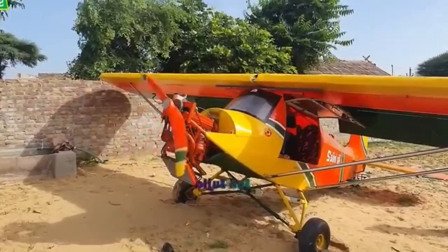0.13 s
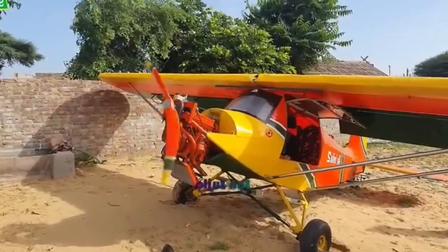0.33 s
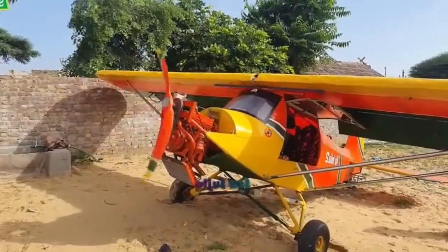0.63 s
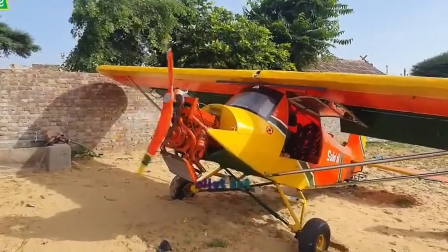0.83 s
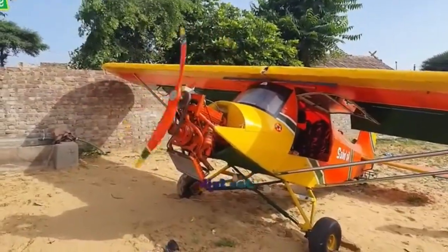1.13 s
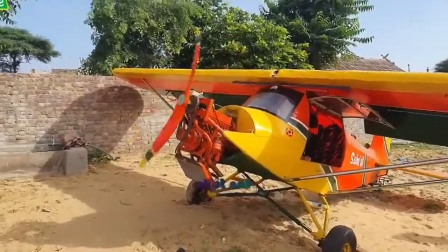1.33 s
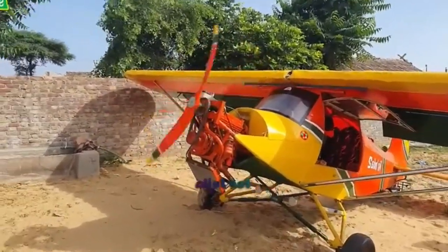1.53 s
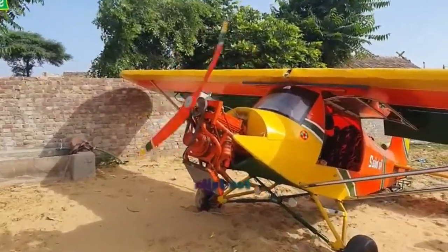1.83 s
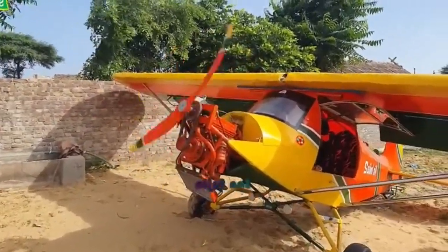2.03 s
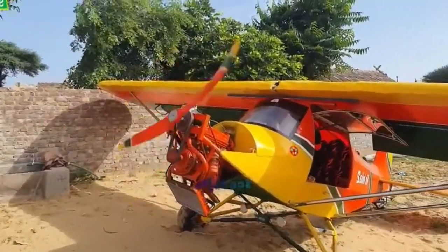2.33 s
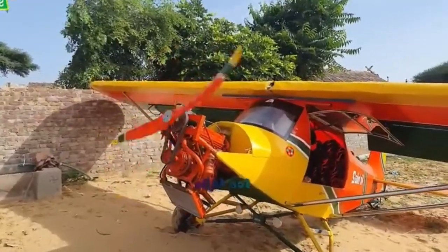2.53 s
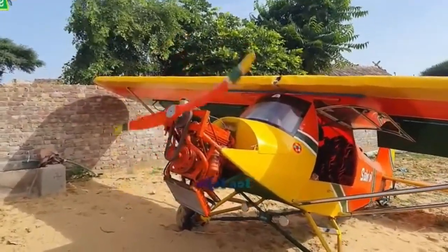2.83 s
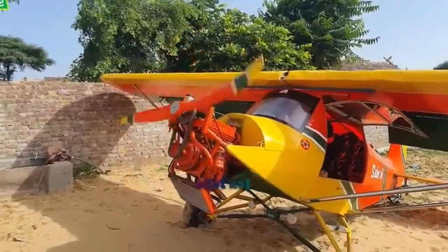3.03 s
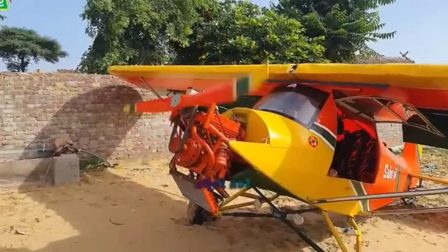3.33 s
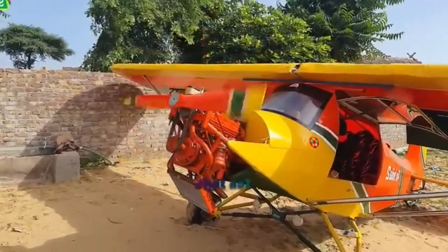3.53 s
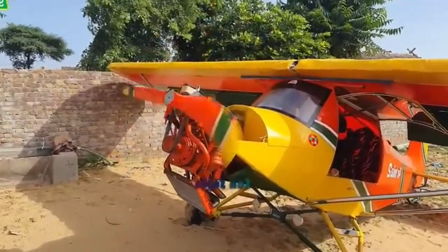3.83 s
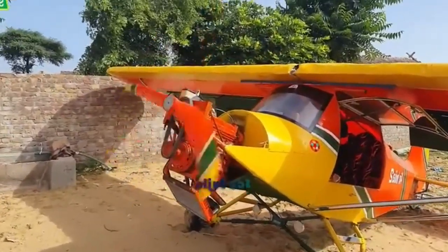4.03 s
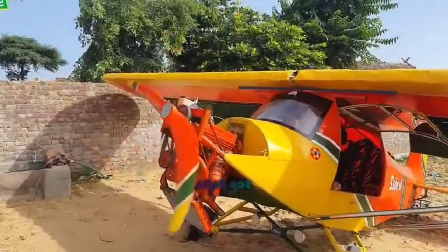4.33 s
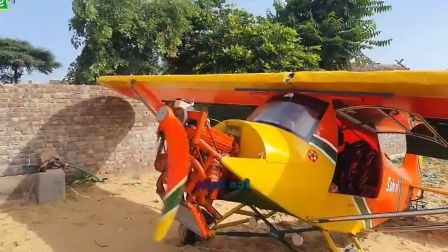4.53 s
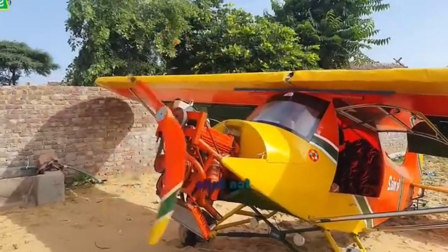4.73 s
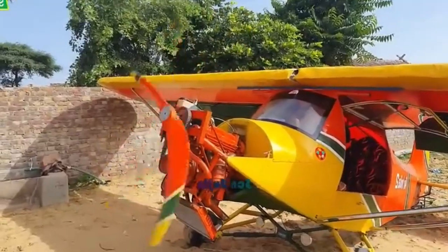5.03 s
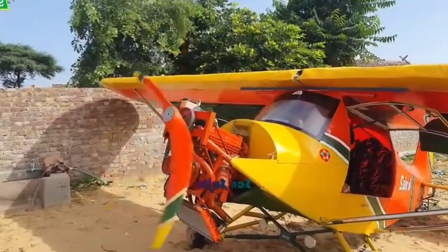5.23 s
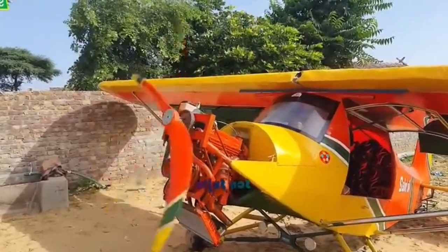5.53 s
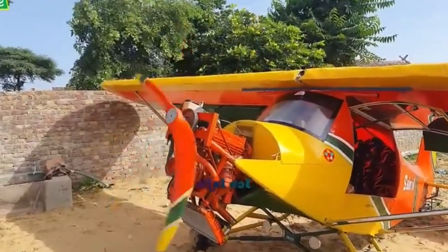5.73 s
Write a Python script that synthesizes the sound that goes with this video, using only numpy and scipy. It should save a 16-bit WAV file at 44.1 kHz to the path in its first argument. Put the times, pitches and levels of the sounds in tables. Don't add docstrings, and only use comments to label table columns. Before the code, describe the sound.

A small four-cylinder aircraft engine is already idling, cut by a tick at 0.1 seconds after a gust. The level starts lowered and recovers within a second. Lumpy exhaust barks repeat steadily with valve clatter, propeller hiss and sparse panel knocks. Low wind thumps hit the close outdoor microphone until about three seconds, while it moves from engine side to nose.

```python
import sys
import numpy as np
from scipy import signal
from scipy.io import wavfile

SR = 44100
rng = np.random.default_rng(int(sys.argv[2]) if len(sys.argv) > 2 else 0)


def int16_out(signal):
    q = np.round(np.clip(np.atleast_2d(signal).T, -1, 1) * 32767)
    wavfile.write(sys.argv[1], SR, q.astype(np.int16))


def boost_factor(decibels):
    exponent = np.asarray(decibels, float) / 20
    return 10 ** exponent


N = 259308

# place/cycle, f/Hz, swell/ms, side level/dB, nose level/dB
THUMP_RINGS = [(0.0021, 77, 9.2, -23.5, -27.5), (0.2752, 120.4, 29.4, -36, -35.5),
               (0.2919, 146.4, 18.7, -39.5, -38.5), (0.3941, 78.2, 19.8, -24, -23.5),
               (0.6328, 68.5, 12.4, -40, -25.5), (0.7395, 88.8, 23.6, -33.5, -25),
               (0.749, 152.5, 23.4, -40.5, -38)]
# place/cycle, f/Hz, swell/ms, side level/dB, nose level/dB
BARK_RINGS = [(0.0235, 473.1, 19.0, -27, -54), (0.0617, 273.9, 30, -46.5, -40),
              (0.1098, 466, 6.9, -25.5, -52), (0.1222, 445.8, 26.7, -42, -28),
              (0.1589, 341.4, 25.7, -50.5, -36.5), (0.2884, 428.6, 17.2, -37.5, -19.5),
              (0.2942, 477.5, 11.1, -27.5, -24), (0.4145, 373.5, 19.3, -36.5, -24),
              (0.4539, 427.2, 25, -34, -23), (0.5504, 390.5, 12.4, -58, -20.5),
              (0.6247, 281.7, 6.3, -36.5, -32.5), (0.6596, 410.1, 11.0, -60, -20),
              (0.8225, 337.6, 9.2, -35, -29.4), (0.001, 461.6, 11.46, -26, -17)]
# place/cycle, f/Hz, swell/ms, side level/dB, nose level/dB
OVERTONE_RINGS = [(0.062, 696, 4.6, -43, -51.5), (0.0272, 610, 2.9, -31, -38.5),
                  (.093, 823, 11, -44.5, -56), (.10, 910, 9.4, -52, -72), (.273, 546, 7.7, -35, -55),
                  (.30, 630.2, 21.6, -43.5, -61), (0.011, 535, 3.2, -34.5, -34),
                  (.63, 603, 4.4, -42.5, -50), (.49, 598, 4, -42, -48)]
# t/s, f/Hz, swell/ms, level/dB
EARLIER_RINGS = [
    (.001, 425, 11, -23.5),
    (.028, 680, 4, -31.5),
    (.04, 920, 5.3, -46),
    (.058, 610, 9.3, -35.5),
]
# cycle number, cycle length/ms
IDLE_SPEED = [
    (0, 130.63),
    (9, 131.58),
    (33, 132.29),
    (44, 133.82),
]
# t/s, bearing/deg (0 side, 90 nose)
WALK_BEARING = [
    (.75, 2.8),
    (2.6, 31),
    (5.1, 73),
]
# t/s, level re full gain/dB
MIC_GAIN = [
    (0, -1),
    (.095, -7),
    (.11, -6.5),
    (.35, -6),
    (1.15, -0.5),
    (2, 0.36),
    (4, 0),
    (5.88, 0.5),
]
# f/Hz, density/dB per Hz
ROAR_SPECTRUM = [(150, -6), (220, -6), (300, -5.5), (450, 1.5), (600, -21), (800, -11), (1000, -49.5)]
# f/Hz, density/dB per Hz
RATTLE_SPECTRUM = [(530, -44), (900, 1), (1030, -4), (1440, 4.5), (1880, 2), (2370, -4.5), (2700, -12),
                   (3510, -31), (5940, -120)]
# f/Hz, density/dB per Hz
HISS_SPECTRUM = [(1350, -18), (2300, -6.5), (2940, 0.5), (3110, 3), (3590, 0), (3860, -0.5), (4450, -1.5),
                 (5140, -3), (8620, -3), (15400, -16)]
# f/Hz, width/Hz, level/dB
CASE_MODES = [(1881, 49, -7), (3230, 90, -22), (1590, 36, -26)]
# f/Hz, width/Hz, level/dB
COWLING_MODES = [(2760, 40, 1), (3214, 34, 3), (3860, 200, -0.5), (5170, 340, -3.5), (5530, 99, -11),
                 (7040, 780, -2.5), (8900, 980, -0.5), (11500, 240, -3.5), (12500, 400, -10)]
# t/s, peak/dB
LOW_PANEL_KNOCKS = [(0.9933, -43), (1.3507, -42.5), (1.4555, -33), (1.8461, -40), (1.9504, -37),
                    (1.9938, -34), (2.3864, -40), (2.9122, -42), (3.2858, -35), (3.328, -32.5),
                    (3.3811, -40), (4.18, -38), (4.4676, -38), (4.704, -34), (5.1611, -38), (5.8231, -37)]
# t/s, peak/dB
HIGH_PANEL_KNOCKS = [(2.1446, -34.5), (2.5365, -35.5), (3.1751, -32), (3.5125, -33.5), (4.8528, -36.5),
                     (4.9171, -41), (4.962, -33.5), (5.0912, -38), (5.5537, -35), (5.6973, -38),
                     (5.7544, -37)]
# t/s, level/dB, half length/s
WIND_GUSTS = [
    (.01, -28, .07),
    (1.19, -30, 0.25),
    (2.15, -31, 0.17),
    (2.5, -37, 0.11),
    (2.92, -40, 0.15),
    (4.1, -33, 0.17),
]
# t/s, f/Hz, level/dB
WIND_BUFFETS = [(0.025, 85, -22), (0.056, 75, -18), (0.082, 72.5, -19.5), (1.043, 88, -23),
                (1.101, 71, -20), (1.144, 80.5, -28), (1.19, 76.6, -15), (1.267, 112, -19),
                (1.212, 149, -20), (1.805, 69.6, -15.5), (2.001, 50, -17), (2.105, 69, -23),
                (2.143, 131, -15.5), (2.164, 150, -23), (2.189, 75.5, -30), (2.279, 90.7, -21),
                (2.393, 96.6, -25), (2.433, 79, -23), (2.483, 82, -28), (2.745, 94, -12.5), (2.8, 50, -22),
                (2.899, 69, -18), (2.954, 82, -18), (3.066, 80.7, -23), (4.0, 50, -31)]
# t/s, peak/dB
TICKS = [
    (0.099, -22),
]


def exhaust():
    gain_db, = in_time(MIC_GAIN)
    thump = boost_factor(-0.26) * pipes(THUMP_RINGS, uneven_db=1.0, late_ms=0.13)
    bark = boost_factor(1) * pipes(BARK_RINGS, uneven_db=-0.66, late_ms=0.042)
    overtones = boost_factor(0.6) * pipes(OVERTONE_RINGS, uneven_db=1.5, late_ms=0.047)
    roar = boost_factor(-34.5 + gain_db) * banded_noise(ROAR_SPECTRUM, patchy_db=0.46, rate_hz=19)
    return boost_factor(0.28 * gain_db) * (thump + bark + overtones) + roar


def pipes(rings, uneven_db, late_ms):
    start_s, cycles = crank()
    lead = SR // 2
    burns = rng.standard_normal((4, 2, 47))
    out = np.zeros(N + lead)
    for place, hz, swell_ms, side_db, nose_db in rings:
        late, strong = burns[round(4 * place) % 4]
        fired_s = np.interp(np.arange(-3, 44) + place, cycles, start_s) + late_ms / 1000 * late
        bearing_deg = np.interp(fired_s, *np.transpose(WALK_BEARING))
        bearing = np.radians(np.clip(bearing_deg, 0, 90))
        heard = boost_factor(side_db) * np.cos(bearing) + boost_factor(nose_db) * np.sin(bearing)
        clicks = np.zeros(N + 2 * lead)
        clicks[(fired_s * SR + lead).round().astype(int)] = heard * boost_factor(uneven_db * strong)
        out += swell(clicks[:N + lead], hz, swell_ms)
    return out[lead:]


def crank():
    cycles = np.arange(-4, 47)
    length_s = np.interp(cycles, *np.transpose(IDLE_SPEED)) / 1000
    start_s = np.cumsum(length_s) - length_s
    return start_s - start_s[4] + 0.1094, cycles


def machinery():
    gain_db, = in_time(MIC_GAIN)
    cycle, = in_time(np.transpose(crank()))
    firing = np.cos(2 * np.pi * (4 * cycle - .4)) + .5 * np.cos(2 * np.pi * (2 * cycle - .65))
    rattle = valve_gear(firing, gain_db) * boost_factor(-48.5 + gain_db + 0.75 * firing)
    hiss = propeller_air(firing) * boost_factor(-48.5 + gain_db)
    return rattle + hiss + panel_knocks()


def valve_gear(firing, gain_db):
    white = rng.standard_normal(N)
    case = sum(boost_factor(db) * rms_one(resonance(white, hz, width_hz)) for hz, width_hz, db in CASE_MODES)
    taps_per_s = 500 * boost_factor(4.5 * firing + 2.5 * drift(9))
    taps = boost_factor(-4.0) * clatter(taps_per_s, low_hz=1268, high_hz=2144, cycles=4.1)
    contact = boost_factor(-0.5) * banded_noise(RATTLE_SPECTRUM, patchy_db=2.0, rate_hz=45)
    return contact + boost_factor(0.9 - 0.69 * gain_db) * case + taps


def clatter(per_s, low_hz, high_hz, cycles):
    strength = boost_factor(3.2 * np.minimum(rng.exponential(1, N), 3.5))
    taps = strength * (rng.random(N) < per_s / SR)
    dealt = rng.integers(0, 10, N)
    pitches_hz = np.geomspace(low_hz, high_hz, num=10)
    rings = (swell(taps * (dealt == k), hz, 1000 * cycles / hz) for k, hz in enumerate(pitches_hz))
    return rms_one(sum(rings))


def propeller_air(firing):
    blades = np.cos(2 * np.pi * 10 * np.arange(N) / SR + 0.32 * drift(1.0))
    grit = boost_factor(3.1 * np.minimum(rng.exponential(1, N), 7))
    air = banded_noise(HISS_SPECTRUM, patchy_db=1.37, rate_hz=54) * rms_one(grit + 1.7)
    panels = 0
    for hz, width_hz, db in COWLING_MODES:
        panels = panels + 0.43 * boost_factor(2.8 * drift(25) + db) * resonance(air, hz, width_hz)
    return rms_one(air + panels) * boost_factor(0.45 * firing + 0.15 * blades)


def panel_knocks():
    low, high = clicks_at(LOW_PANEL_KNOCKS), clicks_at(HIGH_PANEL_KNOCKS)
    shared = boost_factor(-5) * swell(low + high, 2310, 0.98)
    return boost_factor(-2.0) * (swell(low, 1510, 1.3) + swell(high, 1885, 1.9) + shared)


def handling():
    tick = resonance(boost_factor(3) * clicks_at(TICKS) + 1e-18, 2000, 3500)
    return tick + sum(swell(clicks_at([(s, db)]), hz, swell_ms) for s, hz, swell_ms, db in EARLIER_RINGS)


def wind():
    t = np.arange(N) / SR
    gust = boost_factor(-39) + sum(boost_factor(db) * np.exp(-((t - s) / half_s) ** 2) for s, db, half_s in WIND_GUSTS)
    lumps = rng.standard_normal(N) * boost_factor(1.3 * drift(10))
    rumble = signal.sosfilt(signal.butter(2, [45, 110], "band", fs=SR, output="sos"), lumps)
    buffets = sum(swell(clicks_at([(s, db)]), hz, 1000 * 0.57 / hz) for s, hz, db in WIND_BUFFETS)
    return gust * rms_one(rumble) + buffets


def swell(clicks, hz, swell_ms):
    decay = 1000 / (swell_ms * SR)
    pole = np.exp(-decay + 2j * np.pi * hz / SR)
    ring = signal.lfilter([0, pole], [1, -2 * pole, pole ** 2], clicks + 1e-18)
    return np.e * decay * ring.imag


def resonance(x, hz, width_hz):
    r = np.exp(-np.pi * width_hz / SR)
    poles = [1, -2 * r * np.cos(2 * np.pi * hz / SR), r * r]
    return signal.lfilter((1 - r * r) / 2 * np.array([1, 0, -1]), poles, x)


def banded_noise(spectrum, patchy_db, rate_hz):
    hz, level_db = np.transpose(spectrum)
    edges = hz[0] * 2 ** np.arange(0, np.log2(hz[-1] / hz[0]) + .01, 1 / 3)
    edges = np.append(edges[edges < .9 * hz[-1]], 1.1 * hz[-1])
    out, white, together = 0, rng.standard_normal((2, N)), drift(rate_hz)
    for k, (low, high) in enumerate(zip(edges, edges[1:])):
        band = signal.sosfilt(signal.butter(2, [low, high], "band", fs=SR, output="sos"), white[k % 2])
        band_db = np.interp(np.log(low * high) / 2, np.log(hz), level_db)
        flicker_db = patchy_db * (0.36 * together + 0.97 * drift(rate_hz))
        out = out + band * boost_factor(band_db + flicker_db)
    return rms_one(out)


def drift(rate_hz):
    r = np.exp(-80 * np.pi * rate_hz / SR)
    slow = signal.lfilter([1], [1, -2 * r, r * r], rng.standard_normal(N // 40 + 2002))[2000:]
    return np.interp(np.arange(N) / 40, np.arange(len(slow)), rms_one(slow))


def clicks_at(rows):
    s, db = np.transpose(rows)
    clicks = np.zeros(N)
    clicks[(s * SR).round().astype(int)] = boost_factor(db)
    return clicks


def in_time(rows):
    s, *columns = np.transpose(rows)
    return [np.interp(np.arange(N) / SR, s, c) for c in columns]


def rms_one(x):
    return x / np.sqrt(np.mean(x ** 2) + 1e-20)


def scene():
    engine, gusts = exhaust(), wind()
    change, source = round(.0984 * SR), round(1.657 * SR)
    engine[:change] = boost_factor(-5) * engine[source:source + change]
    gusts[change:2 * change] *= np.linspace(0, 1, change) ** 2
    return (engine + machinery() + handling() + gusts)[None, :]


def low_pass(x):
    return signal.sosfilt(signal.butter(12, 15800, fs=SR, output="sos"), x)


def record(dry):
    x = signal.sosfilt(signal.butter(2, 30, "high", fs=SR, output="sos"), dry)
    x = signal.sosfilt(signal.ellip(12, .5, 60, 15520, fs=SR, output="sos"), x)
    return low_pass(x)


dry = scene()
out = record(dry)
int16_out(out)
```